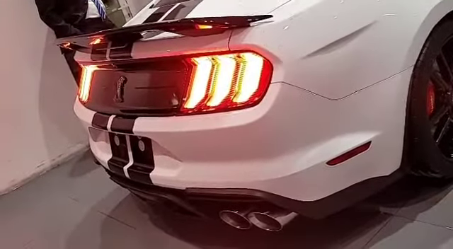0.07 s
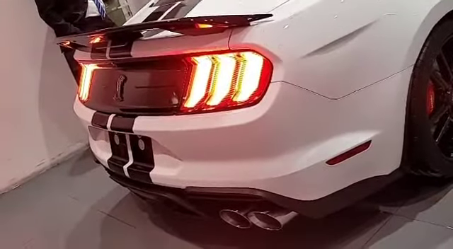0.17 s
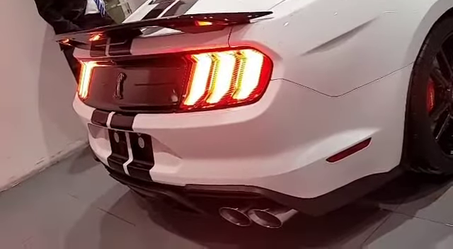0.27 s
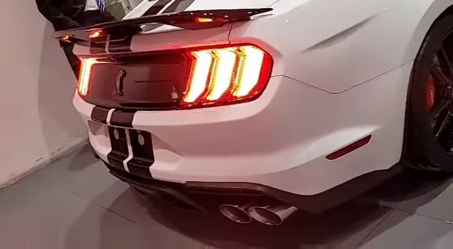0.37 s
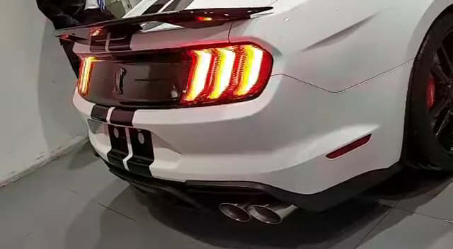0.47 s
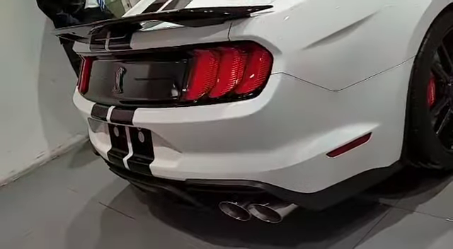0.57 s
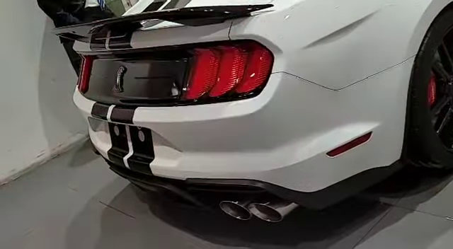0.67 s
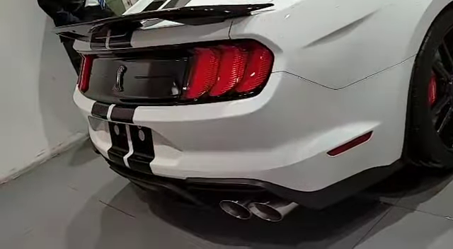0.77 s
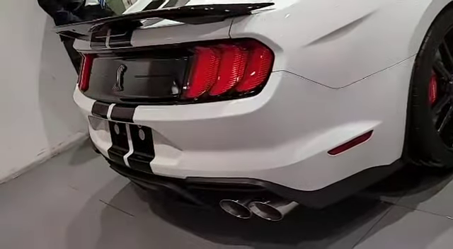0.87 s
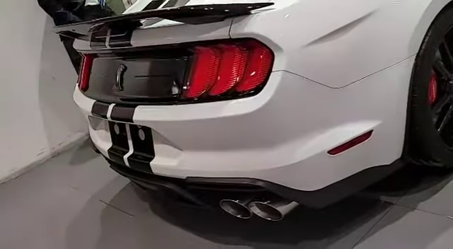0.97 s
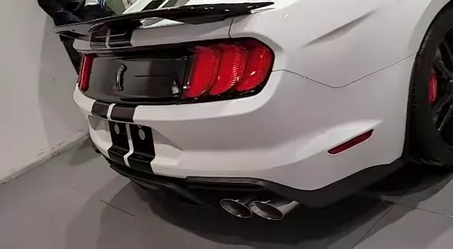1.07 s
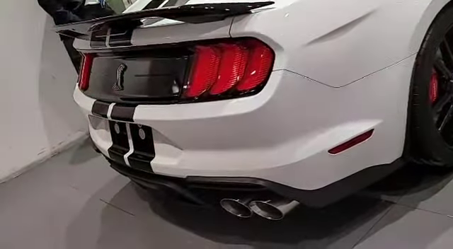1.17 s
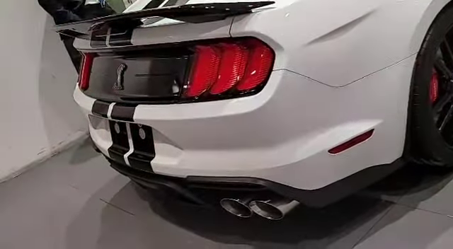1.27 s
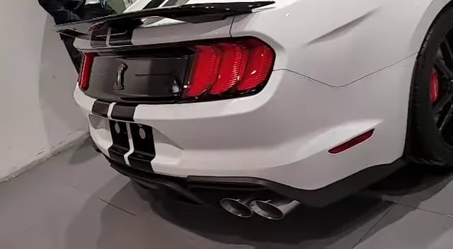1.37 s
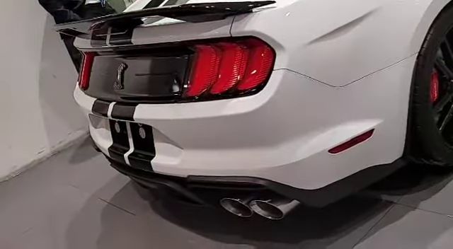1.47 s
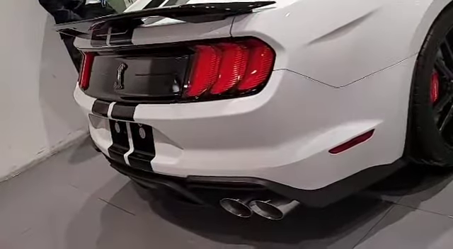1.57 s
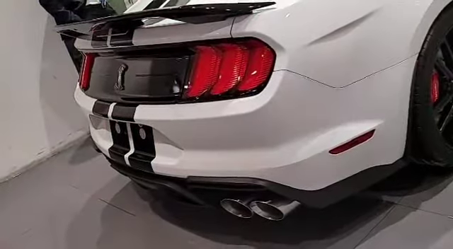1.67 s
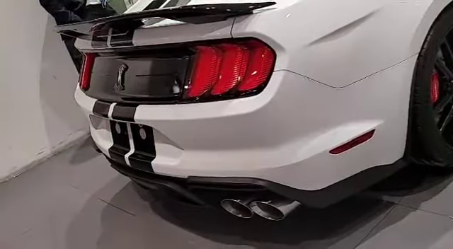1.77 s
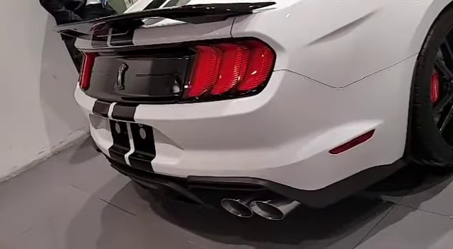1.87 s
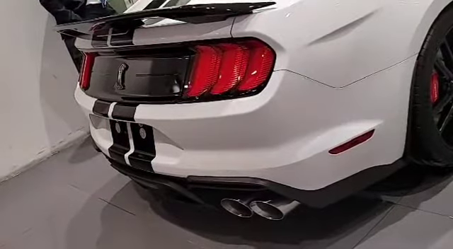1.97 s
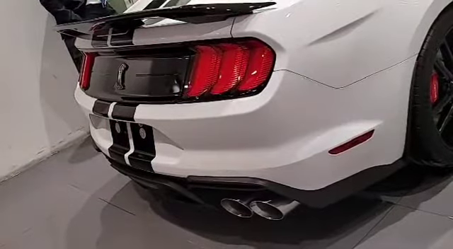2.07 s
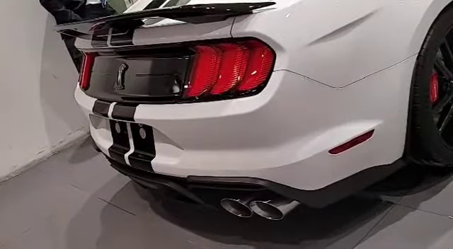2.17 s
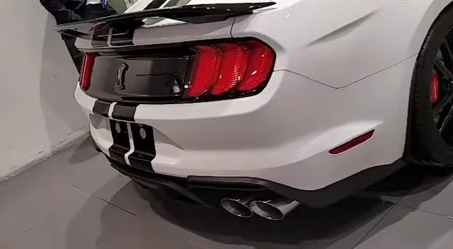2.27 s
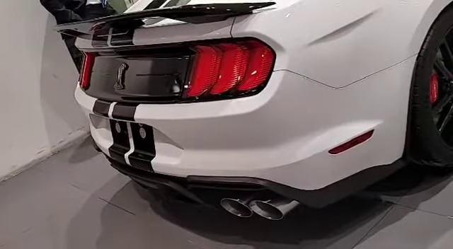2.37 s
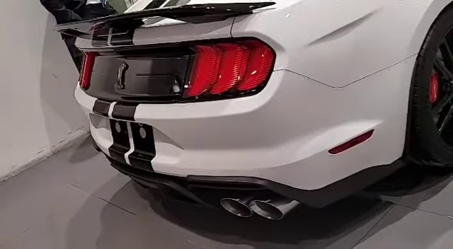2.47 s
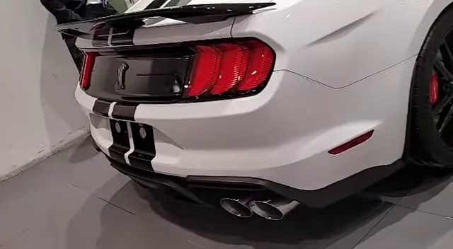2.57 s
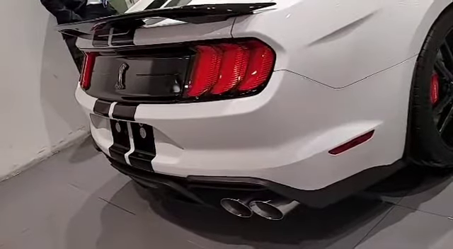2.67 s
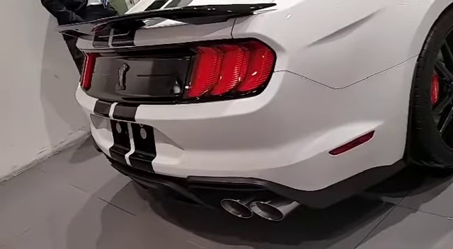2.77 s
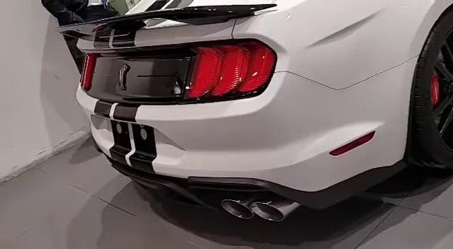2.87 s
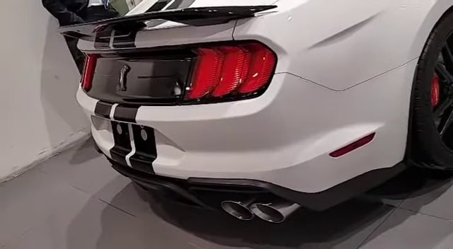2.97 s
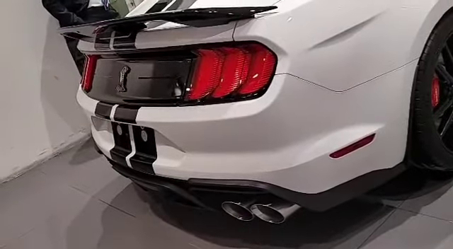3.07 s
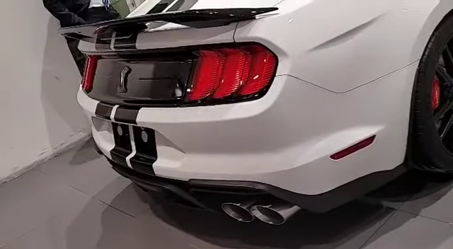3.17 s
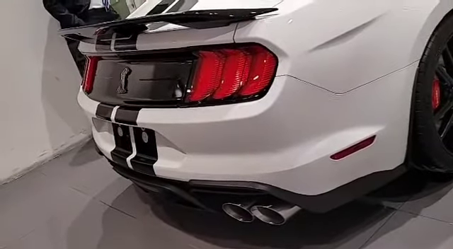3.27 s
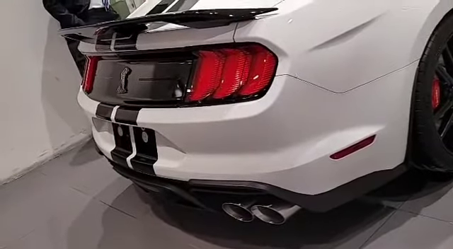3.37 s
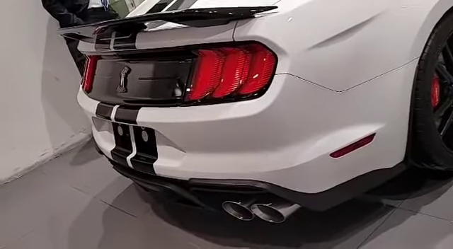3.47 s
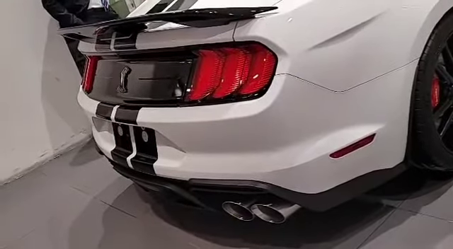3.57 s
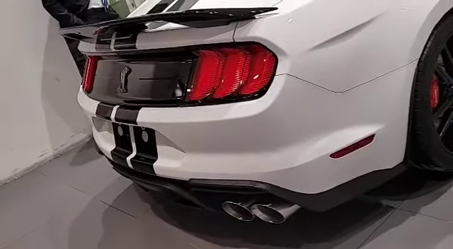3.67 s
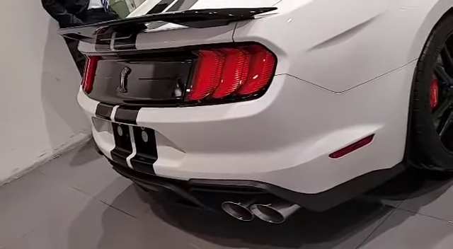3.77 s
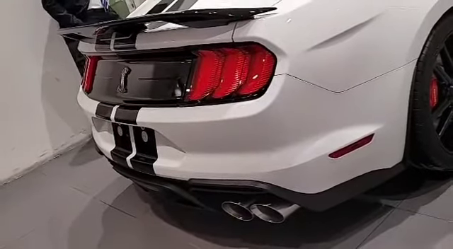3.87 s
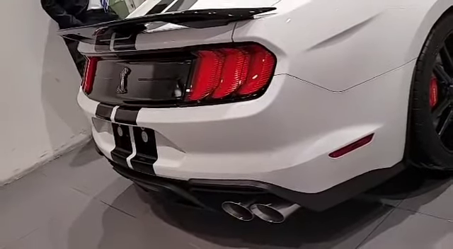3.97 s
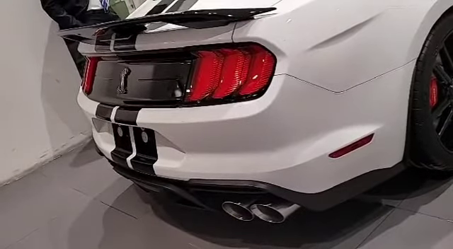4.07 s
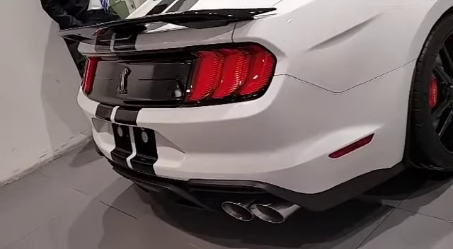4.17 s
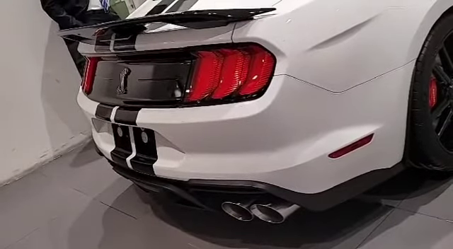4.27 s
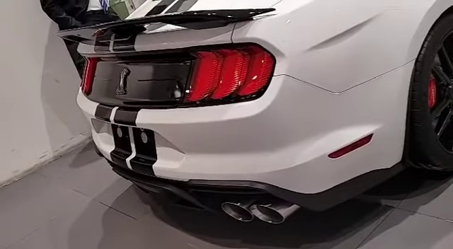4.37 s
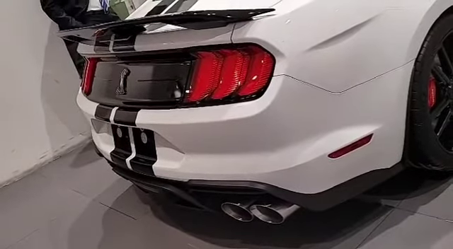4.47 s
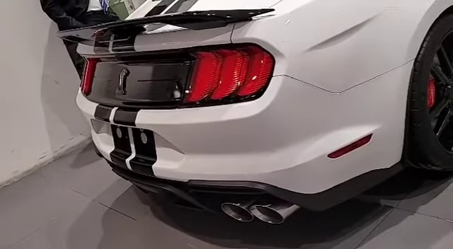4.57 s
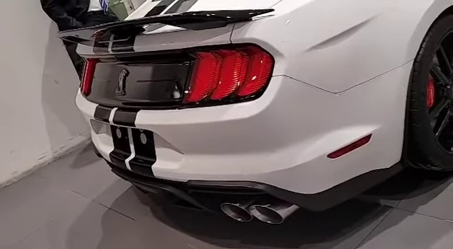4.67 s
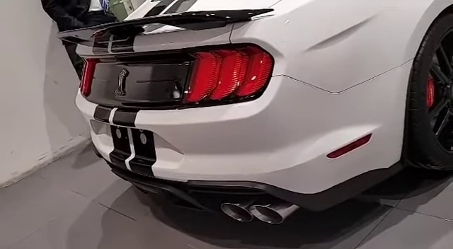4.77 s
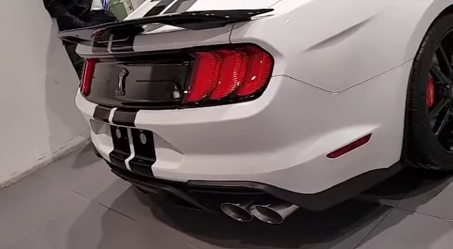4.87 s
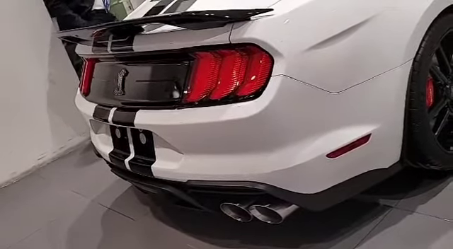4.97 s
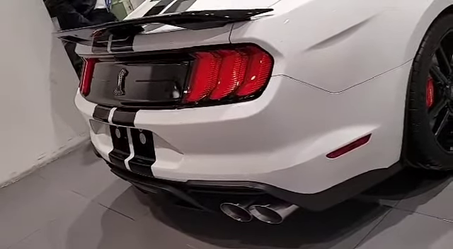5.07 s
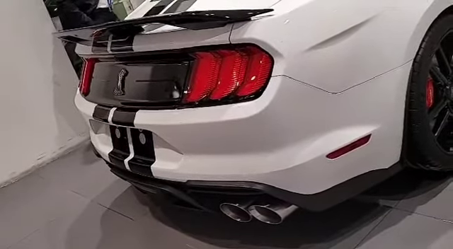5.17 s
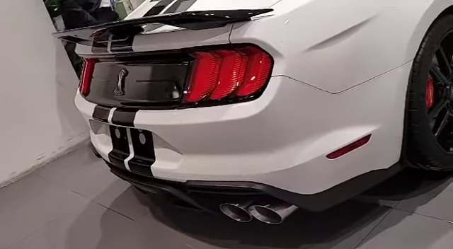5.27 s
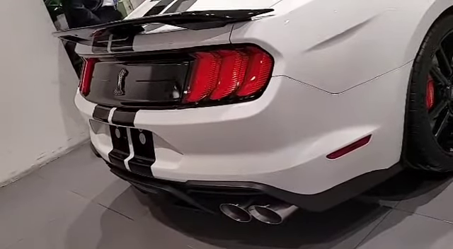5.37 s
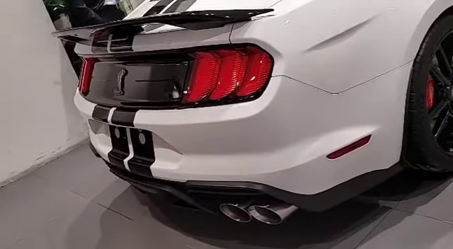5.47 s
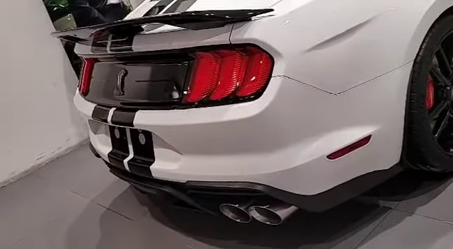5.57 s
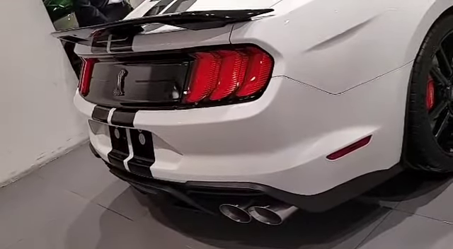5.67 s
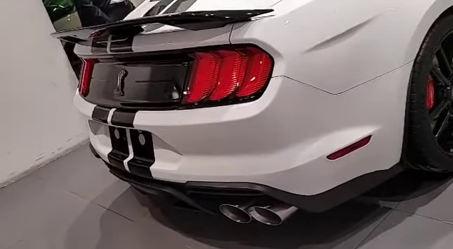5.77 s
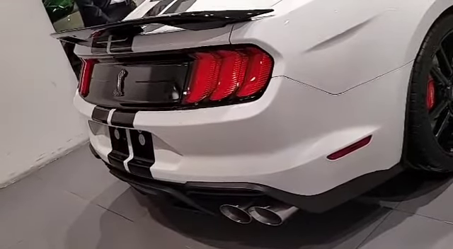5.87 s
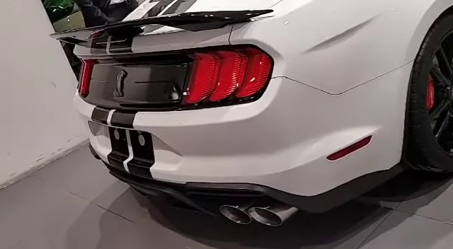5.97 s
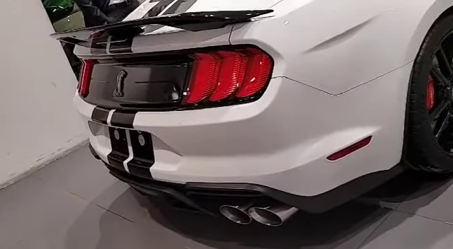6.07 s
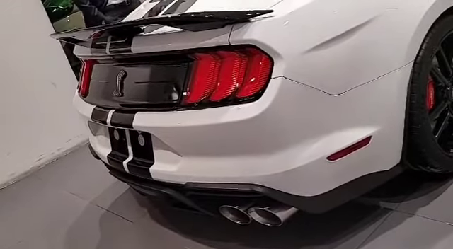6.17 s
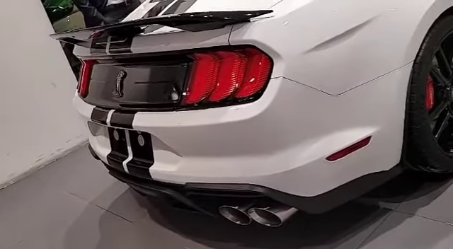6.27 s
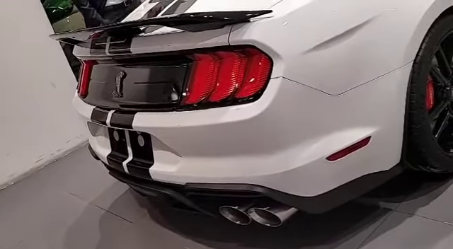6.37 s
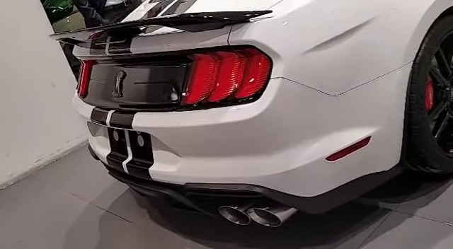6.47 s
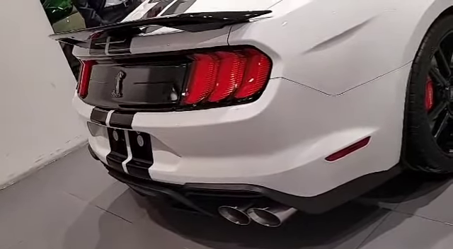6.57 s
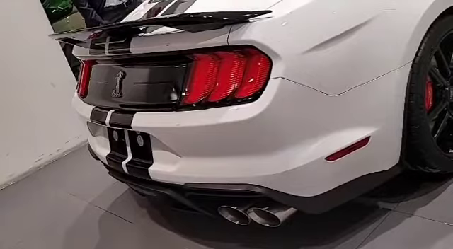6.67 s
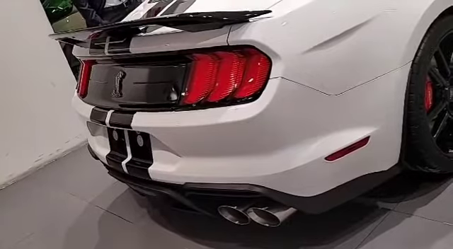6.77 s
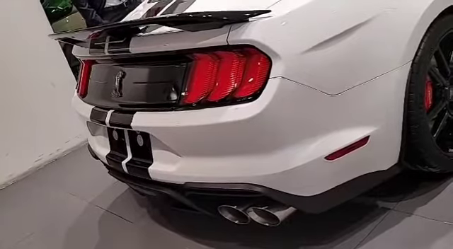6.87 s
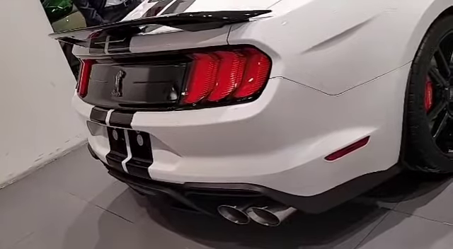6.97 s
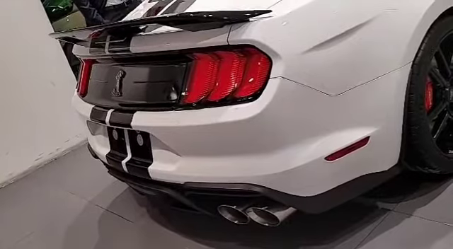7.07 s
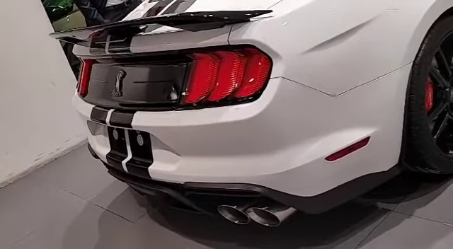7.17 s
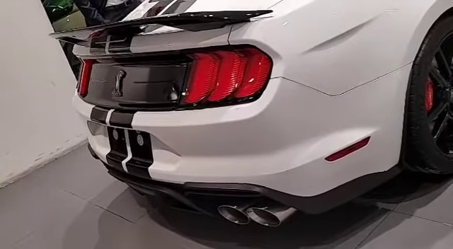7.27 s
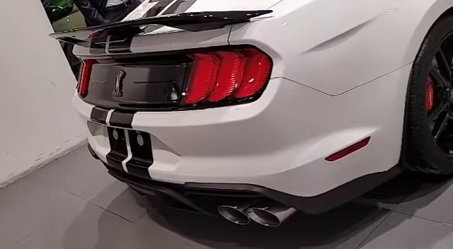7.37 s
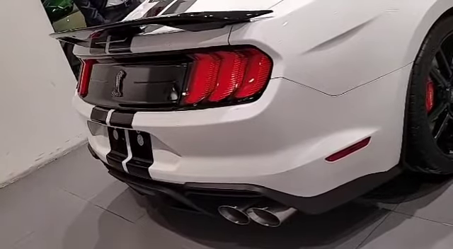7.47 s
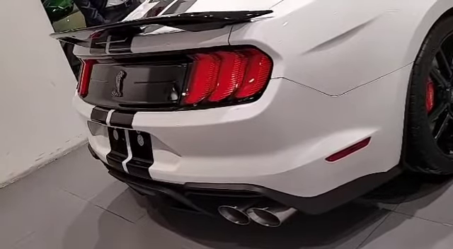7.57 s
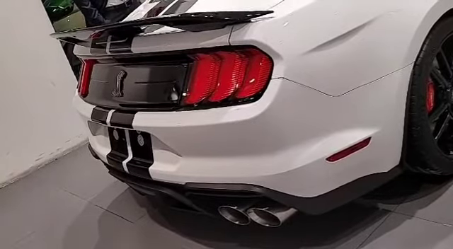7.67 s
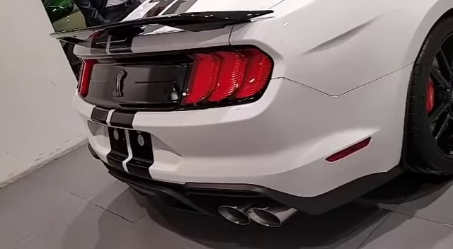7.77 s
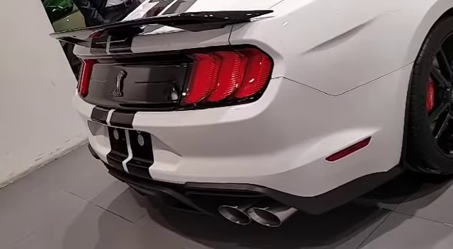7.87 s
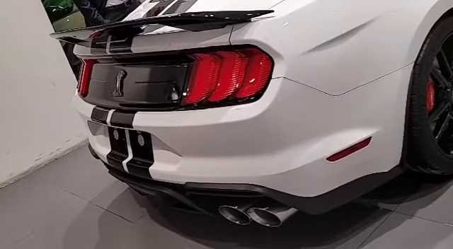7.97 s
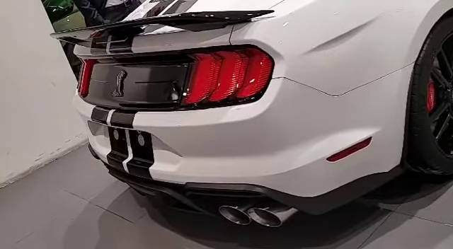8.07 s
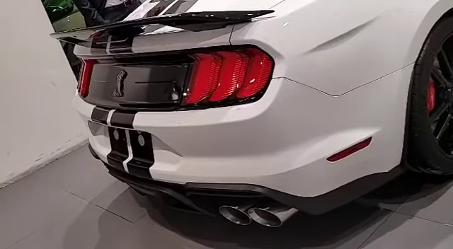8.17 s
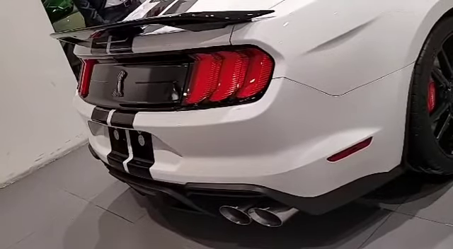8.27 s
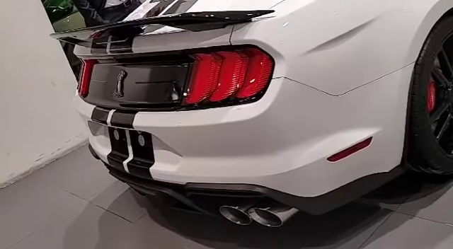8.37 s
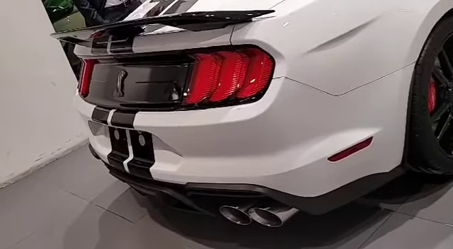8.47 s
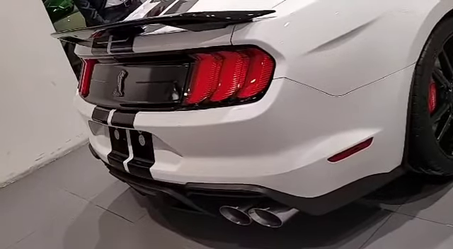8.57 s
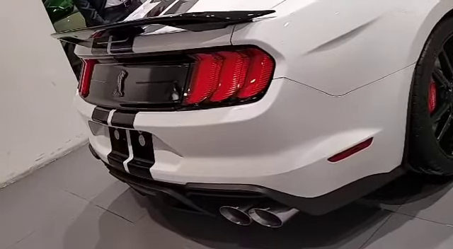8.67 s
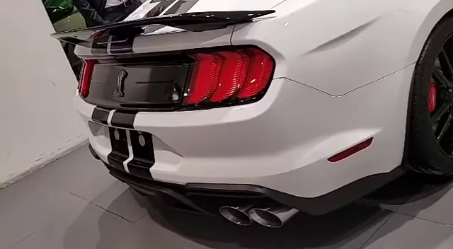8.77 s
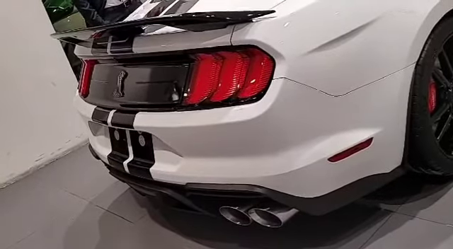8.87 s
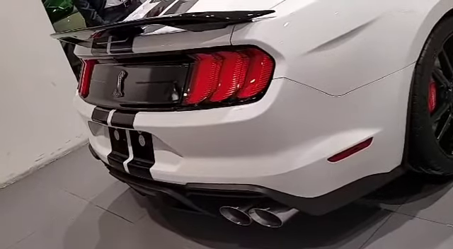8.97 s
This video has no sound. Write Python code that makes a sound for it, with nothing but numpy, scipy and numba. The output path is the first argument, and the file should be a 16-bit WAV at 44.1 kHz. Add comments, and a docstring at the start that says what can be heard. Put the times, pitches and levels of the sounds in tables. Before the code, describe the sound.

In a bare, closed garage, close behind the tailpipes, a starter whines and grinds for half a second over a few thumping compressions. A V8 catches with coughs and cracks, flares into a rough tearing roar, then drops quickly. It settles to a loud, fast, uneven idle, booming off the walls, with small bright spits from the pipes and steady humming overtones.

```python
"""Closed garage, just behind the tailpipes: a V8 is started cold.
The starter whines and grinds over a few compressions, cylinders catch, revs flare and sink to a fast, lumpy idle.
Starter: gear tones and tooth-noise bursts in the housing. First strokes: decaying low sines and noise coughs.
Exhaust: eight uneven pulses a cycle ring pipes, muffler and walls (boom, bark); noise puffs rasp and hiss.
Cracks, hard barks and spits add to it; clear overtones and a pulley whine stand out at idle."""
import sys
import numpy as np
from scipy import signal
from scipy.fft import rfft, irfft
from scipy.io import wavfile
from scipy.ndimage import uniform_filter1d
from numba import njit

SR = 44100
rng = np.random.default_rng(int(sys.argv[2]) if len(sys.argv) > 2 else 0)


def bounce(signal):
    """Save signal as a 16-bit WAV file at the path given by the first command-line argument."""
    frames = np.transpose(np.atleast_2d(signal))
    limited = np.clip(frames, -1, 1)
    pcm = np.round(limited * 32767).astype(np.int16)
    wavfile.write(sys.argv[1], SR, pcm)


N = 397782
TIME = np.arange(N) / SR

# engine speed once running: t/s, firing rate f/Hz
SPEED = [(0.56, 67.89), (0.7, 108.9), (0.85, 117.97), (1.0, 114.32), (1.25, 102.62), (1.4, 103.14),
         (1.5, 99.33), (1.75, 97.52), (2.0, 93.93), (2.5, 92.53), (3.0, 91.24), (3.2, 91.67), (3.4, 91.33),
         (4.2, 89.73), (4.4, 90.59), (4.7, 90.57), (5.2, 89.43), (5.4, 91.06), (5.6, 90.1), (6.2, 89.55),
         (6.75, 89.48), (6.95, 90.98), (7.2, 89.8), (7.6, 90.61), (8.15, 89.44), (8.35, 90.01), (8.6, 89.3),
         (9.0, 90.3)]
# cylinders in firing order, before scaling: arrival in slot/0-1, level/dB
CYLINDERS = [(0.0, -2.71), (0.22, 5.96), (0.39, 2.64), (0.35, 9.34), (0.19, -5.14), (0.43, 1.22),
             (0.5, -5.02), (0.41, 7.69)]
# firing strengths most unequal while coasting, more alike in flare and idle: t/s, share of level differences/1
UNEVEN = [(1, 0.55), (1.7, 0.85), (2.3, 0.4), (3, 0.54)]
# likeness of the two crank turns of a cycle: t/s, likeness/0-1
LIKENESS = [(1.05, 0.53), (1.5, 0.13), (1.9, 0.21), (2.25, 0.84), (3.1, .65), (3.7, 0)]

# pipe and garage resonances: f/Hz, width/Hz, level/dB
PIPE = [(69.9, 6.3, -18.5), (93, 6, -18), (114.6, 10, -19), (145.7, 8.9, -28), (188.7, 7, -21),
        (235.8, 8, -21), (290, 6.1, -12.2), (327.5, 7.1, -7), (356.4, 14.4, -10.1), (383.4, 7.1, -12)]
# slower standing waves between the walls: f/Hz, width/Hz, level/dB
WALLS = [(293, 56.5, 1), (406.2, 13.8, 2.5), (427, 9.1, 7.5), (481.9, 12.5, 0.5), (528.5, 17, -9.5),
         (577.9, 13.5, 0), (612, 30, -5), (697, 45, -12.5), (785.4, 40, -13.5), (927, 8.5, -14)]
# muffler note, moving with gas heat and flow: t/s, centre f/Hz, level re bark/dB
MUFFLER = [(.56, 357, 2), (1, 336, 0.5), (1.55, 393.4, -0.5), (2, 368.8, 5), (3, 361, -1.5),
           (3.8, 334, -24.5)]
# rough drone under load: multiple of firing rate/1, level/dB
DRONE = [(2, -7.5), (3, -5.5), (4, -4.5), (5, -13.5)]
# overtones singing out as revs sink: multiple of firing rate/1, from t/s, to t/s, level re bark/dB
SINGING = [(3, .62, 1.0, -6), (4, .78, 1.0, -9), (4, 1.85, 2.3, -4), (3.75, 2.15, 3.38, 1),
           (5.75, 2.2, 3.1, -14.5), (3.25, 2.15, 3.6, -6), (3, 2.7, 3.3, -11), (4.25, 3.5, 9.2, -18),
           (4.375, 3.3, 9.2, -13), (6.375, 3.3, 9.2, -18)]
# clear overtones at idle: multiple of firing rate/1, level/dB
OVERTONES = [(3, -40), (3.625, -34), (5.125, -37), (5.375, -37), (5.75, -42), (6.875, -42), (7.625, -43),
             (8.375, -46), (8.75, -44), (9.5, -48), (10, -48), (12, -50), (12.5, -51), (18, -58)]
# escaping gas spectrum: f/Hz, density level/dB
GAS = [(290, -26), (500, 8), (585, -13.5), (651, -13.5), (780, -16.5), (900, -17.5), (984, -20.5),
       (1130, -18), (1360, -29.5), (1550, -26.5), (1750, -38), (2140, -34), (2320, -46), (2930, -45.5),
       (3600, -69), (4680, -68.5), (7920, -120)]
# fine spray at the pipe mouths, spectrum: f/Hz, density level/dB
SPRAY = [(2800, -3.5), (3600, -12.5), (4400, -5), (5100, -3.5), (6400, -11.5), (8000, -12), (9600, -20),
         (12000, -14), (14000, -21.5)]

# start-up flare; rows boom, bark, rasp, hiss: flare level/dB, held until t/s, release/s, coasting level/dB
FLARE = [(-21, 1.05, 0.065, -24), (-13, 0.97, 0.18, -21), (-17, 0.91, 0.46, -38.5),
         (-42.5, 0.83, 0.28, -55.5)]
# load taken up near idle; rows boom, bark, rasp, hiss: idle level/dB, overshoot/dB
IDLE = [(-17, 0.5), (-14, -1.73), (-30.5, 1), (-49.5, 3)]
# hardest firings, top of the flare: t/s, half width/s
PEAK_PULL = (0.8, 0.066)

# pinion teeth on the flywheel, before sag and flutter: t/s, mesh rate f/Hz
MESH = [(0, 999), (.05, 1038), (.1, 1004), (.14, 1185), (.21, 1225), (.25, 1370), (.3, 1330), (.34, 1407),
        (.38, 1369), (.42, 1532), (.47, 1457), (.55, 1602)]
# starter and bell housing spectrum: f/Hz, density level/dB
HOUSING = [(71, -54), (120, -4.5), (412, -5), (705, -9.5), (895, -3.5), (989, 1), (1090, -5), (1210, -4.5),
           (1560, -5.5), (2570, -5.5), (3610, -15), (4580, -6.5), (8150, -14), (12600, -22.5), (14000, -36)]
# gear tones: multiple of mesh rate/1, level/dB
GEAR_TONES = [(1, -1), (2, -1), (3, -10), (3.33, -4), (4, -5)]

# slow strokes, cranking and catching: t/s, relative thump level/dB, relative combustion level/dB
STROKES = [(.002, -21, -47), (0.111, -13.5, -57), (0.191, -17, -57), (0.276, -14, -46), (0.372, -13, -50),
           (0.449, -15, -43), (0.48, -1, -23), (0.504, 2.5, -16.5), (0.528, -13, -17), (0.547, -23, -24),
           (0.563, -22, -30)]
# lone combustion in the cold pipe, spectrum: f/Hz, density level/dB
COUGH = [(60, 8), (130, 0.5), (350, 1.5), (600, -10.5), (1200, -17), (3000, -56), (12000, -36.5)]
# late burns cracking in the pipes: t/s, relative level/dB
CRACKS = [(.564, -19), (.577, -15.5), (.604, -17), (.626, -17), (.690, -23), (.729, -19), (.765, -19),
          (.793, -20), (.813, -19), (.889, -24)]
# crack spectrum: f/Hz, density level/dB
CRACK_COLOUR = [(600, 4), (900, 7.5), (1550, 1), (2200, -12), (3100, -20), (3700, -24), (5200, -19),
                (8000, -41), (13000, -41)]
# firings that bark harder: t/s, relative level/dB
BARKS = [(.649, -9), (.708, -5), (.833, -11), (.850, -9), (.936, -11), (.972, -10), (1.006, -9),
         (1.106, -13)]
# muffler resonance of a hard bark: f/Hz, width/Hz, relative level/dB
BARK_RING = [(400, 89, -2)]
# loudest spits at the pipe mouths: t/s, relative level/dB
SPITS = [(2.937, -28), (3.153, -33), (3.24, -29), (3.403, -30), (3.503, -28), (3.99, -30), (4.066, -27),
         (4.258, -33), (4.433, -31), (4.523, -33), (4.685, -31), (5.662, -35), (5.752, -33)]
# resonances of a spit: f/Hz, width/Hz, level/dB
SPIT_RING = [(2730, 400, -6.5), (4640, 400, -4.5), (5080, 430, -2), (5540, 400, -17)]
# lesser spits, swelling then fading: t/s, level/dB
SPITTING = [(2.2, -75), (2.9, -52), (4.2, -59), (6, -63.5), (9, -64)]
# brief dip in level: from t/s, to t/s
GAP = (6.121, 6.157)

# idle load: onset, rise length, overshoot peak, settling time
PICKUP_S, PICKUP_RISE_S, OVERSHOOT_S, SETTLE_S = 1.96, 0.63, 3.34, 1.25
BOOM_BUILD_S = 0.052  # a few firings
IDLE_NOTE_DB, PICKUP_RUMBLE_DB = -30, -7  # re boom; rumble at full overshoot
WALLS_COAST_DB, WALLS_LOAD_RISE_DB = -9, 4  # re bark
CHURN_DB = -12  # re bark
SING_FADE_S = 0.087
DRIVE_SCALE_DB, DRIVE_HOLD_S, DRIVE_RELEASE_S = 4, 0.58, 0.78  # scale before build-up and decay
TEAR_DB, TEAR_PEAK_DB, TEAR_FADE_DB_PER_S = -13.5, 7, 3.5  # re rasp
# bark throb while coasting: depth before levelling, one crest, middle and half length of the stretch
LOPE_DB, LOPE_CREST_S, LOPE_MID_S, LOPE_HALF_S = 2.8, 1.637, 1.65, .27
BELT_RATIO, BELT_DB = 10.35, -45  # pulley whine, multiple of firing rate
MESH_SAG, STRAIN_S = 0.029, 0.025  # peak share of speed lost; lead and width of the strain
GEAR_ROUGH, GEAR_FLUTTER_HZ = .7, 55  # flutter depth, bandwidth
STARTER_DB = -31
WHINE_START_DB, WHINE_DROP_DB, ENGAGE_S = 6, 9, 0.054  # whine re clatter
GRIND_DB, GRIND_LAG_S, GRIND_S = 2.5, 0.057, .02
TOP_HZ = 14000


def undb(db):
    """Decibels to gain."""
    return 10 ** (np.asarray(db) / 20)


def curves(table):
    """Columns of a (t, ..) table, interpolated per sample."""
    s, *columns = np.transpose(table)
    return [np.interp(TIME, s, c) for c in columns]


def held(until_s, release_s):
    """1 until a moment, then exponential decay."""
    return np.exp(-np.maximum(TIME - until_s, 0) / release_s)


def ramp(start_s, length_s):
    """Straight rise from 0 to 1."""
    return np.clip((TIME - start_s) / length_s, 0, 1)


def bump(at_s, width_s):
    """Gaussian swell from 0 to 1 and back."""
    return np.exp(-((TIME - at_s) / width_s) ** 2)


def steady(x, span=0.14):
    """Level to a running rms near 1 over span seconds."""
    power = uniform_filter1d(x * x, int(span * SR))
    floor = np.mean(x * x) / 10 ** 4
    return x / np.sqrt(np.maximum(power, 0) + floor)


def cut(x, hz, kind, order=4):
    """Butterworth filter."""
    return signal.sosfilt(signal.butter(order, hz, kind, fs=SR, output="sos"), x + 1e-18)


def tremor(hz):
    """Random wavering slower than hz, spread 1."""
    x = cut(rng.standard_normal(N), hz, "low", order=2)
    return x / x.std()


def colour(x, points):
    """Minimum-phase filter with an (f, dB) response, falling off outside the points."""
    hz, db = np.transpose(points)
    log_f = np.log(np.maximum(np.fft.rfftfreq(4096, 1 / SR), 1))
    below = np.maximum(np.log(hz[0]) - log_f, 0)
    above = np.maximum(log_f - np.log(hz[-1]), 0)
    response_db = np.interp(log_f, np.log(hz), db) - 20 * (below + above)
    cepstrum = irfft(np.log(undb(response_db)))
    # fold to the causal half
    cepstrum[1:] *= 2 * (np.arange(1, len(cepstrum)) < len(cepstrum) / 2)
    impulse = irfft(np.exp(rfft(cepstrum)))
    return signal.fftconvolve(x, impulse)[:N]


def ring(x, modes):
    """Sum of (f, width, dB) resonances."""
    out = 0
    for hz, width_hz, db in modes:
        b, a = signal.iirpeak(hz, hz / width_hz, fs=SR)
        out = out + undb(db) * signal.lfilter(b, a, x + 1e-18)
    return out


@njit
def sweep(x, hz, width):
    """Band-pass with a moving centre (state-variable filter)."""
    y, b, l = np.empty(len(x)), 0., 0.
    for i in range(len(x)):
        g, k = np.tan(np.pi * hz[i] / SR), width / hz[i]
        v = (b + g * (x[i] + 1e-18 - l)) / (1 + g * (g + k))
        b, l, y[i] = 2 * v - b, l + 2 * g * v, k * v
    return y


def track(x, hz, width_hz):
    """Two moving band-passes in series, levelled."""
    once = sweep(x, hz, float(width_hz))
    return steady(sweep(once, hz, float(width_hz)))


def clicks(times, sizes):
    """One pulse at each time, shared between two samples."""
    out = 0
    for k in range(2):
        index = np.clip(times * SR, 0, N).astype(int) + k
        weights = sizes * abs(1 - k - times * SR % 1)
        out = out + np.bincount(index, weights, N + 2)[:N]
    return out


def puffs(pulses, decay_s):
    """Noise burst dying away after each pulse."""
    envelope = signal.lfilter([1], [1, -np.exp(-1 / (decay_s * SR))], pulses + 1e-18)
    return envelope * rng.standard_normal(N)


def garage(x, t60, wet_db):
    """Direct sound plus dense reflections from bare walls and floor: decaying noise, t60 in s."""
    t = TIME[:SR // 2]
    tail = rng.standard_normal(len(t)) * np.exp(-np.log(1000) * t / t60) * (t > .004)
    return x + undb(wet_db) * signal.fftconvolve(x, tail / np.linalg.norm(tail))[:N]


def overtones(turn):
    """Wavering sines at idle: clear engine overtones and the thin whine of a belt-driven pulley."""
    out = 0
    for multiple, db in OVERTONES + [(BELT_RATIO, BELT_DB)]:
        waver = 1 + .3 * tremor(6)
        tone = np.sin(2 * np.pi * (multiple * turn + rng.random()))
        out = out + np.sqrt(2) * undb(db) * waver * tone
    return out * ramp(2.1, 1.3)


def gear_whine(mesh):
    """Worn-gear tones, each fluttering on its own in level and phase."""
    out = 0
    for k, db in GEAR_TONES:
        level = undb(db) * (1 + GEAR_ROUGH * tremor(GEAR_FLUTTER_HZ))
        phase = k * mesh + GEAR_ROUGH * np.sqrt(k / 2) * tremor(GEAR_FLUTTER_HZ)
        out = out + level * np.sin(phase)
    return out


def starter():
    """Gear teeth whine and clatter in the housing until the pinion drops out."""
    # the motor labours against each compression, just before the cylinder lets go
    strain = np.max([bump(s - STRAIN_S, STRAIN_S) for s, _, _ in STROKES], axis=0)
    mesh_hz = curves(MESH)[0] * (1 - MESH_SAG * strain)
    mesh = 2 * np.pi * np.cumsum(mesh_hz * (1 + .005 * tremor(50))) / SR
    # off-centre pinion: side tones around the mesh tone
    wobble = 1 + .6 * np.sin(mesh / 3)
    whine = steady(garage(wobble * gear_whine(mesh), t60=.2, wet_db=-6))
    whine_db = WHINE_START_DB - WHINE_DROP_DB * ramp(0, ENGAGE_S)

    teeth_s = TIME[1:][np.diff(mesh // (2 * np.pi)) > 0]
    knocks = clicks(teeth_s, undb(1.6 * rng.exponential(size=N)[:len(teeth_s)]))
    clatter = garage(puffs(knocks, 0.00093), t60=0.41, wet_db=-9)
    clatter = steady(colour(clatter, HOUSING))
    # teeth grind harder as the motor spins up after each stroke
    grind = np.max([bump(s + GRIND_LAG_S, GRIND_S) for s, _, _ in STROKES], axis=0)
    level = undb(STARTER_DB + GRIND_DB * grind) * held(0.536, 0.019)
    return level * (clatter + undb(whine_db) * whine)


def strokes():
    """Single cylinders push air out with a deep thump (decaying sines) and a noise cough of combustion."""
    s, thump_db, burn_db = np.transpose(STROKES)
    t = TIME[:SR // 4]
    tones = np.sin(2 * np.pi * 54 * t) + 0.25 * np.sin(2 * np.pi * 73 * t)
    thud = tones * np.exp(-t / 0.038) * (1 - np.exp(-t / 0.007))
    thumps = signal.fftconvolve(clicks(s, undb(thump_db)), -thud)[:N]
    thumps = cut(thumps, 65.5, "high", order=3)
    cough = colour(puffs(clicks(s, undb(burn_db)), 0.022), COUGH)
    return thumps + undb(20) * cough


def cracks():
    """Late burns: short bursts of gas with a steep front, echoed by the walls."""
    s, db = np.transpose(CRACKS)
    bursts = colour(puffs(clicks(s, undb(db)), 0.0032), CRACK_COLOUR)
    return undb(15) * garage(bursts, t60=0.18, wet_db=0)


def barks():
    """Hard firings give the muffler resonance a short extra kick."""
    s, db = np.transpose(BARKS)
    return undb(32) * ring(clicks(s, undb(db)), BARK_RING)


def spitting(pulses):
    """Cold pipes spit: short bright ringing ticks ride on firings, a few louder ones apart."""
    s, db = np.transpose(SPITS)
    loud = undb(6) * puffs(clicks(s, undb(db)), .004)
    lesser = puffs(pulses * undb(20 * rng.random(N)), 0.003)
    lesser = steady(ring(lesser, SPIT_RING), span=0.43)
    lesser_gain = undb(curves(SPITTING)[0]) * ramp(PICKUP_S, PICKUP_RISE_S)
    ticks = ring(loud, SPIT_RING) + lesser_gain * lesser
    return garage(cut(ticks, [2400, 6300], "band", order=2), t60=.2, wet_db=-10)


def overshoot():
    """Extra load, 0-1: rises as the engine takes up the idle, then settles."""
    return ramp(PICKUP_S, OVERSHOOT_S - PICKUP_S) * held(OVERSHOOT_S, SETTLE_S)


def loudness(flare, idle):
    """Voice level in dB: flare, coasting, then the load of the cold idle."""
    flare_db, until_s, release_s, coast_db = flare
    idle_db, over_db = idle
    flare_part = (flare_db - coast_db) * held(until_s, release_s)
    idle_part = (idle_db - coast_db) * ramp(PICKUP_S, PICKUP_RISE_S)
    return coast_db + flare_part + idle_part + over_db * overshoot()


def drive():
    """Gain of hard, even firing: builds up to the top of the flare, fades as the throttle shuts."""
    build = ramp(SPEED[0][0], PEAK_PULL[0] - SPEED[0][0]) ** 1.13
    return undb(DRIVE_SCALE_DB) * build * held(DRIVE_HOLD_S, DRIVE_RELEASE_S)


def tearing():
    """Gain of the tearing gas: strongest at the top of the flare, fading steadily after it."""
    fade_db = TEAR_FADE_DB_PER_S * np.maximum(TIME - PEAK_PULL[0], 0)
    return undb(TEAR_DB + TEAR_PEAK_DB * bump(*PEAK_PULL) - fade_db)


def gas(pulses):
    """Turbulence behind each pulse rasps, tears when driven hard, and hisses."""
    # the steep front repeats from cycle to cycle, the turbulence does not
    front_gain = undb(-4.5) + undb(0.5) * drive()
    front = front_gain * steady(pulses) + steady(puffs(pulses, 0.0039))
    rasp = colour(garage(front, t60=0.53, wet_db=10.5), GAS)
    rasp = steady(cut(rasp, [640, 3300], "band"), span=0.12)
    tear = garage(drive() * steady(pulses) + steady(puffs(pulses, .004)), t60=.2, wet_db=-1)
    tear = steady(cut(cut(tear, 1350, "high"), 2200, "low"), span=.1)
    # some puffs hiss harder; the walls draw each out
    jets = puffs(pulses * undb(2 * rng.exponential(size=N)), 0.0052)
    wash = undb(5.0) * steady(puffs(pulses, 0.04))
    hiss = colour(garage(steady(jets) + wash, t60=0.36, wet_db=-9.5), SPRAY)
    hiss = cut(hiss, 2370, "high")
    return steady(rasp + tearing() * tear, span=0.048), steady(hiss)


def muffler(pulses, width_hz):
    """A steep, moving resonance picks out one engine order after another."""
    centre_hz, db = curves(MUFFLER)
    return undb(db) * track(pulses, centre_hz, width_hz)


def singing(bark, firing_hz, width_hz):
    """Single overtones of the bark swell into clean notes that follow the revs."""
    out = 0
    for multiple, start_s, end_s, db in SINGING:
        # whole orders of the engine cycle
        hz = firing_hz * round(multiple * len(CYLINDERS)) / len(CYLINDERS)
        rise = ramp(start_s - SING_FADE_S / 2, SING_FADE_S)
        fall = ramp(end_s - SING_FADE_S / 2, SING_FADE_S)
        out = out + undb(db) * (rise - fall) * track(bark, hz, width_hz)
    return out


def pipes(pulses, turn):
    """Pulses ring pipes, muffler and walls: a deep boom and a bark."""
    surge, firing_hz = drive(), curves(SPEED)[0]
    pipe = ring(pulses, PIPE)
    boom = steady(cut(cut(pipe, 54.3, "high", order=6), 239.5, "low"))
    # under load cylinders fire alike: firing note over a rumble, overtones merge into a rough drone
    note = track(boom, firing_hz, 14.0)
    rumble = steady(cut(puffs(pulses, 0.057), [90, 260], "band", order=2))
    shaky_turn = turn + 0.011 * tremor(59)
    tones = sum(undb(db) * np.sin(2 * np.pi * round(k) * shaky_turn) for k, db in DRONE)
    drone = steady((1 + 0.43 * tremor(59)) * tones)
    note_gain = undb(IDLE_NOTE_DB) + np.sqrt(surge) * undb(-24.0)
    rumble_gain = surge * undb(-12.0) + overshoot() * undb(PICKUP_RUMBLE_DB)
    boom = steady(boom + note_gain * note + rumble_gain * rumble)

    bark = steady(cut(cut(pipe, 300.6, "high"), 336.3, "low", order=5))
    walls = 0
    for hz, width_hz, db in WALLS:
        mode = [(hz, width_hz, 0)]
        walls = walls + undb(db) * ring(ring(pulses, mode), mode)
    walls_db = WALLS_COAST_DB + WALLS_LOAD_RISE_DB * ramp(PICKUP_S, PICKUP_RISE_S)
    bark = bark + undb(walls_db) * steady(walls)
    churn = garage(puffs(pulses, 0.0061), t60=0.57, wet_db=10.0)
    churn = steady(cut(churn, [280, 700], "band", order=2))
    notes = singing(bark, firing_hz, width_hz=5.3) + muffler(pulses, width_hz=43.0)
    return boom, steady(bark + notes + undb(CHURN_DB) * churn + surge * drone)


def lope(turn):
    """Bark gain: the lightly loaded engine swells and sags once per cycle."""
    cycle = (turn - np.interp(LOPE_CREST_S, TIME, turn)) / len(CYLINDERS)
    depth_db = LOPE_DB * bump(LOPE_MID_S, LOPE_HALF_S)
    return steady(undb(depth_db * np.cos(2 * np.pi * cycle)))


def firings(turn, scatter_db, jitter_s, spread):
    """Pulse train, each cylinder with its own delay and strength; delays grow lumpier towards idle."""
    slot = np.arange(int(turn[-1]) - 1)
    when = np.interp(slot, turn, TIME)
    own = np.array(CYLINDERS)[slot % len(CYLINDERS)]
    opposite = np.array(CYLINDERS)[(slot + len(CYLINDERS) // 2) % len(CYLINDERS)]
    alike = np.clip(np.interp(when, *np.transpose(LIKENESS)), 0, 1)
    late, db = own.T + alike * (opposite - own).T / 2
    chance = rng.standard_normal((1024, 2))[slot].T
    lumpy = np.interp(when, [1.6, 3.4], [.7, 1])
    times = np.interp(slot + late.mean() + lumpy * (late - late.mean()), turn, TIME)
    uneven = spread * np.interp(when, *np.transpose(UNEVEN))
    # chance scatter shrinks as the lumpiness grows
    level_db = uneven * db + scatter_db / lumpy * chance[1]
    return clicks(times + jitter_s / lumpy * chance[0], undb(level_db))


def exhaust():
    """Running engine: firings drive the four exhaust voices, spits and overtones."""
    running = ramp(SPEED[0][0], 0.0024)
    turn = np.cumsum(curves(SPEED)[0] * (running > 0)) / SR  # counts firings
    pulses = firings(turn, scatter_db=1.45, jitter_s=.00004, spread=0.94)
    blasts = firings(turn, scatter_db=1.1, jitter_s=.00006, spread=0.61)  # gas leaves more evenly
    boom, bark = pipes(pulses, turn)
    rasp, hiss = gas(blasts)
    boom = boom * ramp(SPEED[0][0], BOOM_BUILD_S)
    bark = bark * lope(turn)
    hiss = hiss * undb(2.6 * bump(*PEAK_PULL))
    voices = 0
    for flare, idle, voice in zip(FLARE, IDLE, (boom, bark, rasp, hiss)):
        voices = voices + undb(loudness(flare, idle)) * voice
    return running * voices + spitting(blasts) + overtones(turn)


def scene():
    """Starter, first strokes, late burns, hard firings and the running engine."""
    return (starter() + strokes() + cracks() + barks() + exhaust())[None]


def record(dry):
    """Peaks are rounded, the level dips once by 34 dB, the top is cut."""
    ceiling = 0.68
    rounded = dry / (1 + (dry / ceiling) ** 6) ** (1 / 6)
    inside_s = np.minimum(TIME - GAP[0], GAP[1] - TIME)
    shut = np.clip(inside_s / 0.006 + .5, 0, 1)
    dipped = rounded * (1 - shut * (1 - undb(-34)))
    return signal.sosfilt(signal.ellip(10, .2, 80, TOP_HZ, fs=SR, output="sos"), dipped)


dry = scene()
out = record(dry)
bounce(out)
```